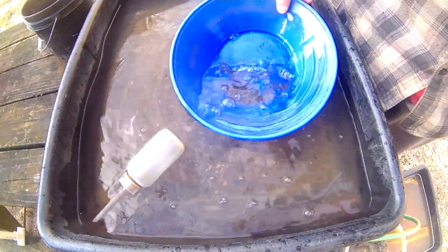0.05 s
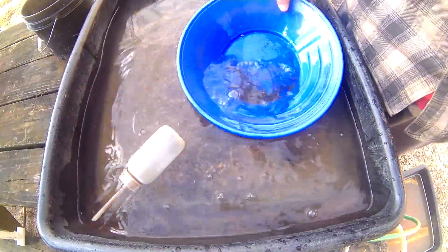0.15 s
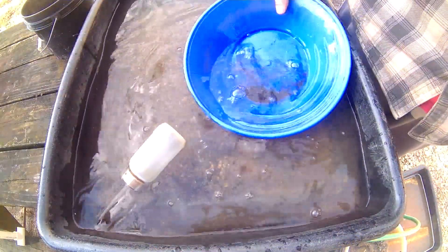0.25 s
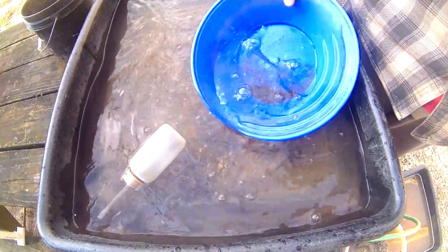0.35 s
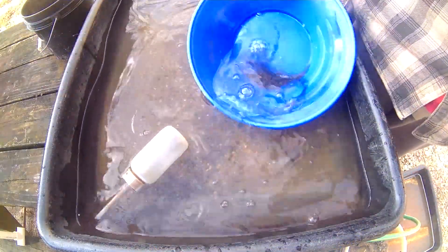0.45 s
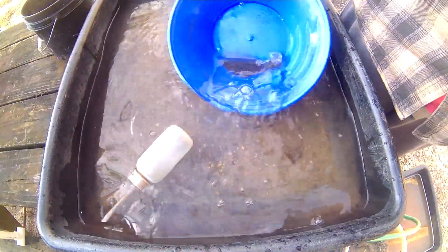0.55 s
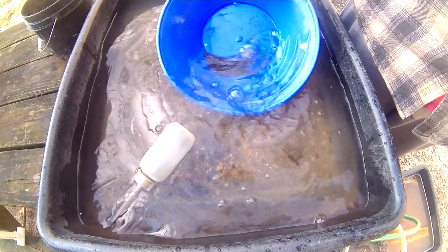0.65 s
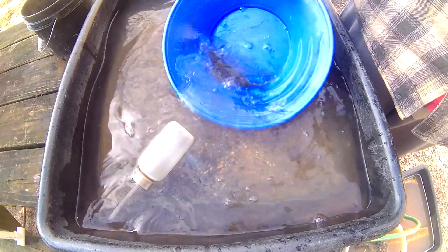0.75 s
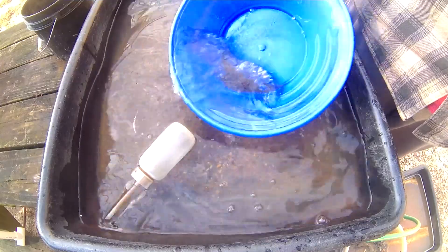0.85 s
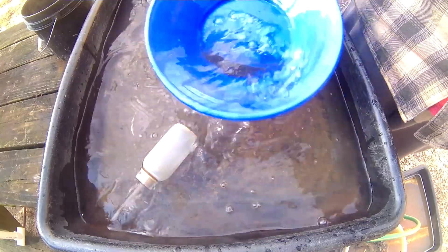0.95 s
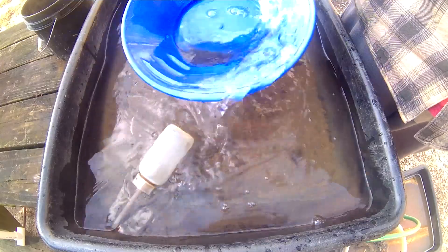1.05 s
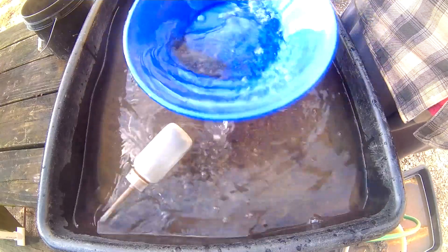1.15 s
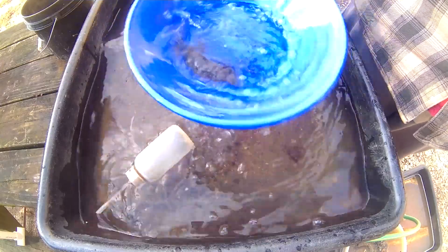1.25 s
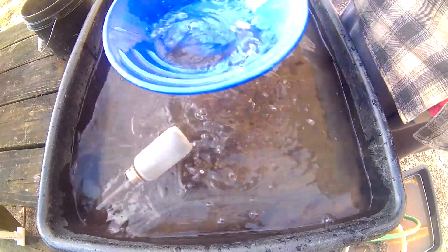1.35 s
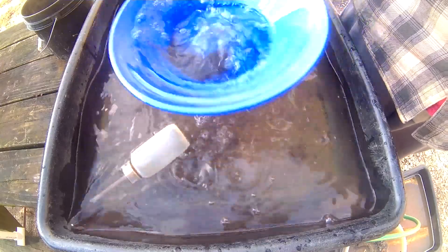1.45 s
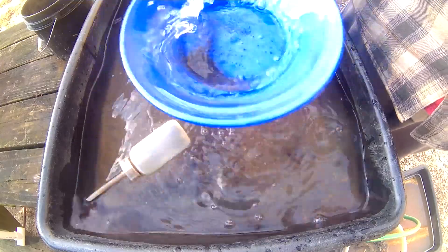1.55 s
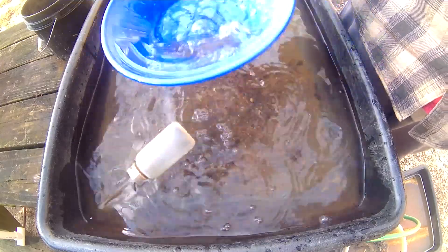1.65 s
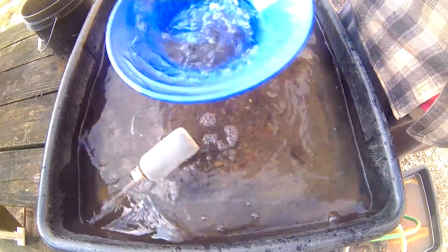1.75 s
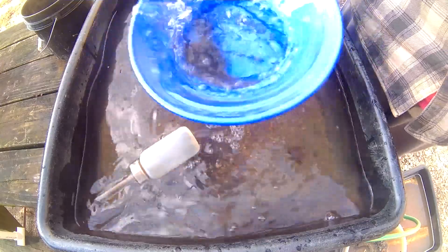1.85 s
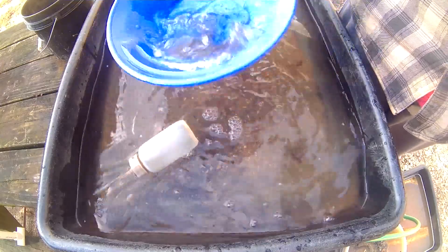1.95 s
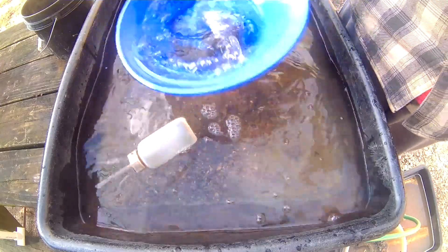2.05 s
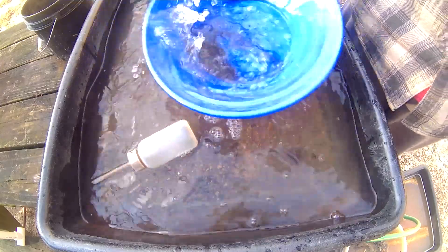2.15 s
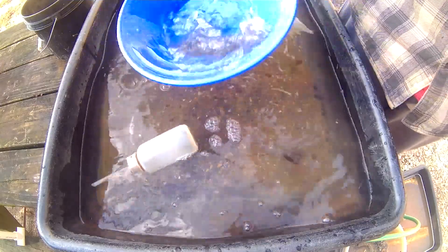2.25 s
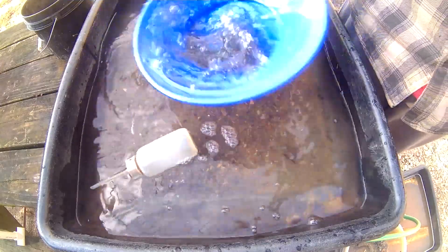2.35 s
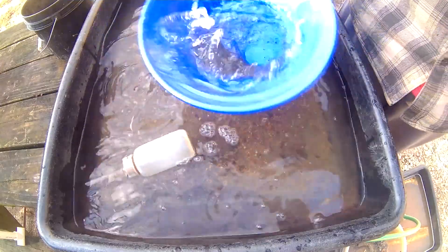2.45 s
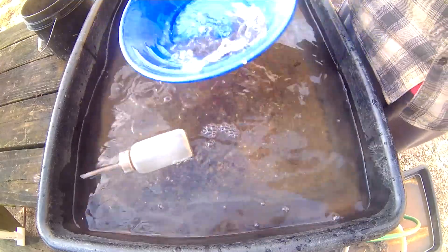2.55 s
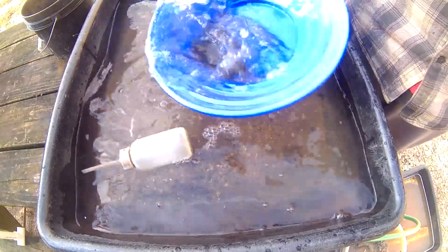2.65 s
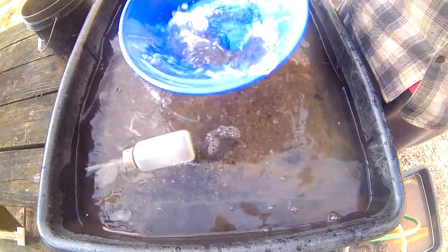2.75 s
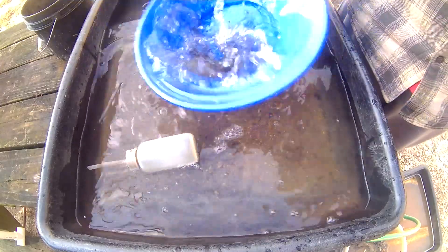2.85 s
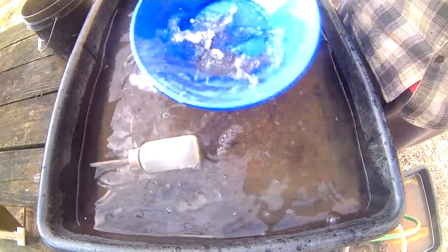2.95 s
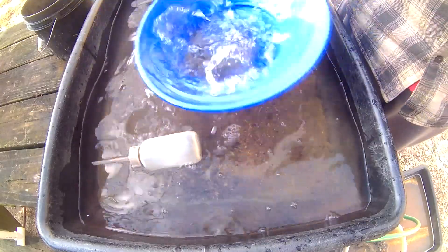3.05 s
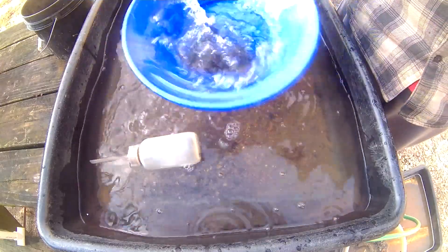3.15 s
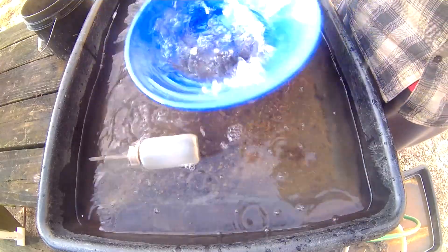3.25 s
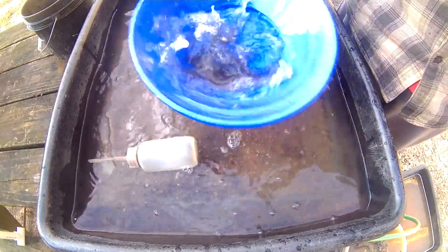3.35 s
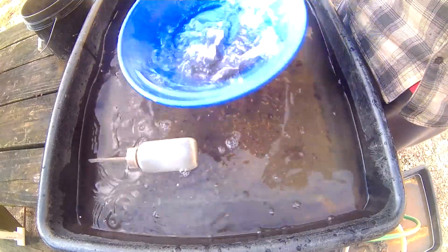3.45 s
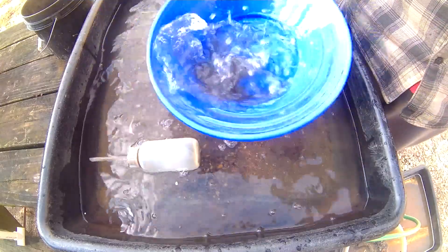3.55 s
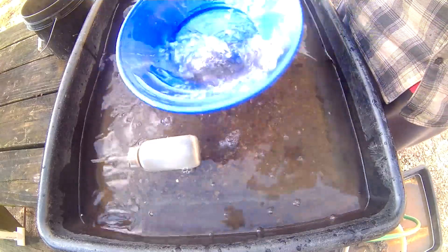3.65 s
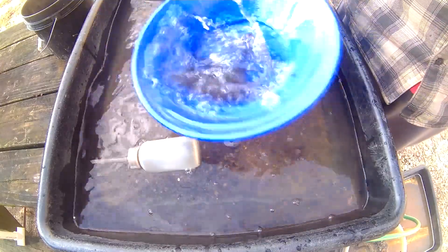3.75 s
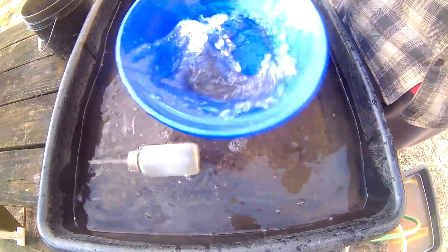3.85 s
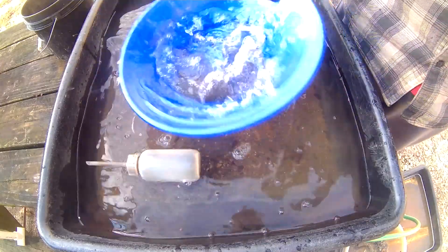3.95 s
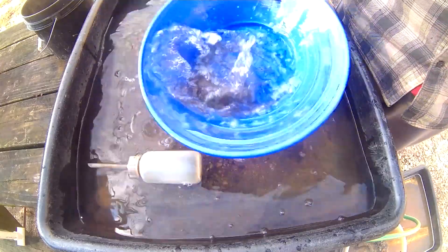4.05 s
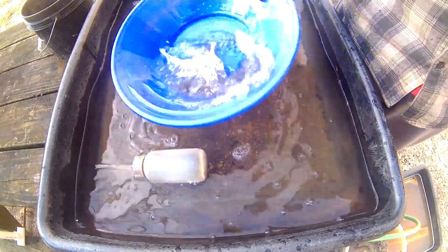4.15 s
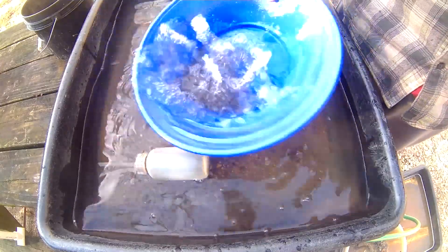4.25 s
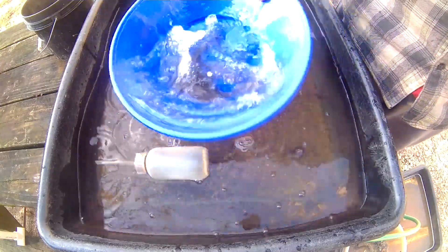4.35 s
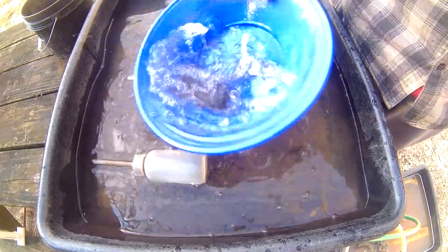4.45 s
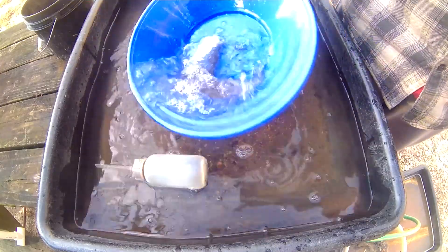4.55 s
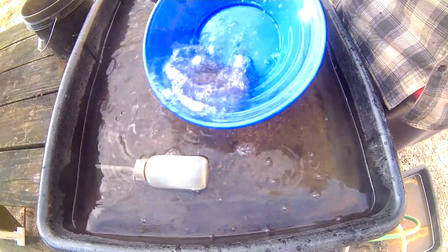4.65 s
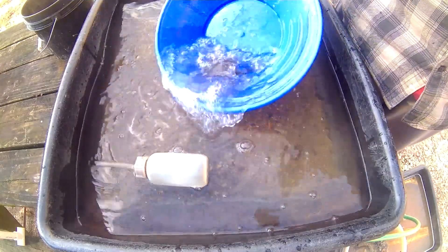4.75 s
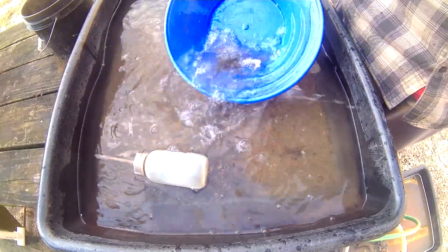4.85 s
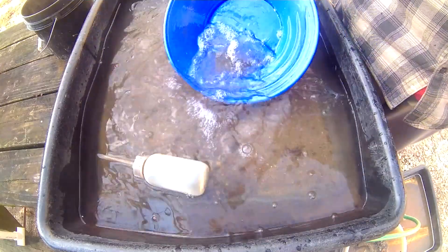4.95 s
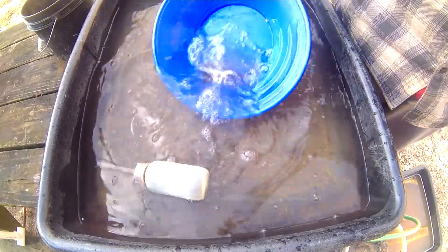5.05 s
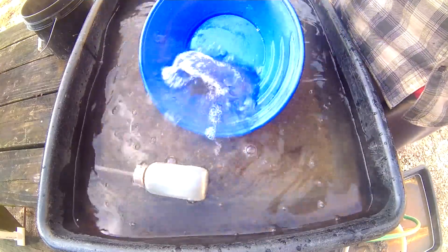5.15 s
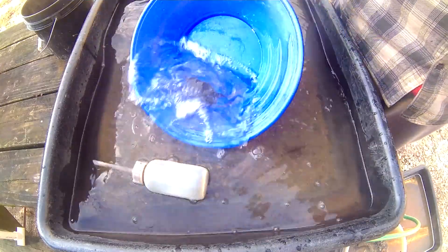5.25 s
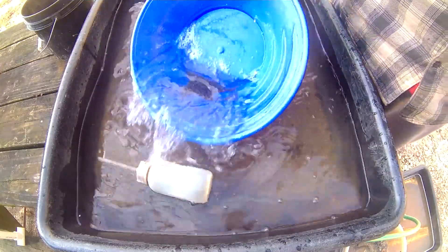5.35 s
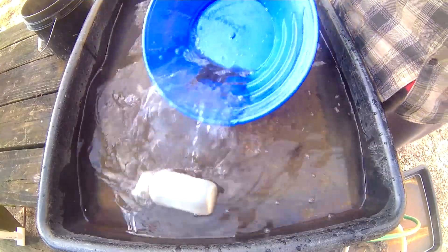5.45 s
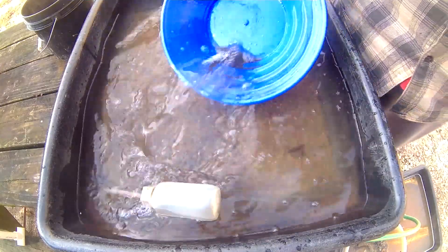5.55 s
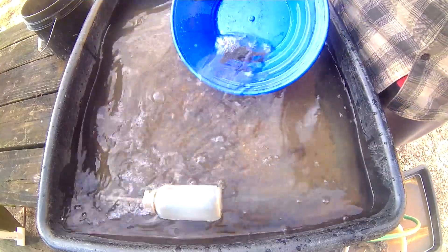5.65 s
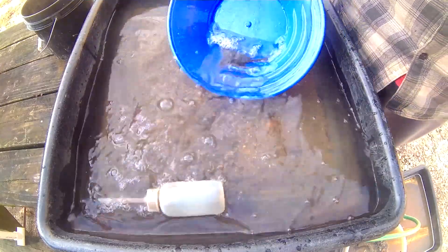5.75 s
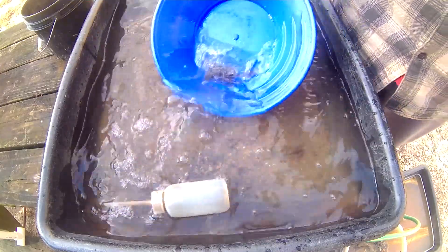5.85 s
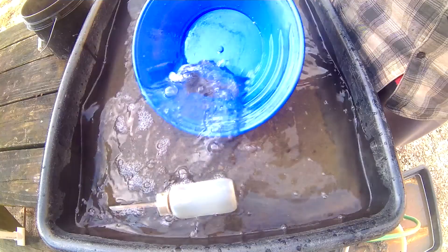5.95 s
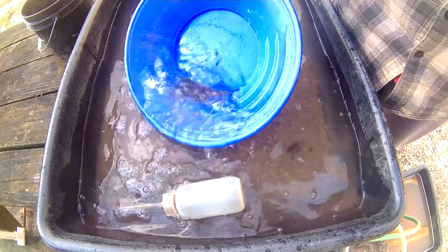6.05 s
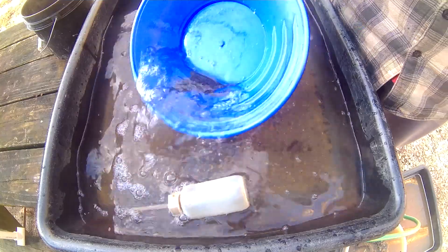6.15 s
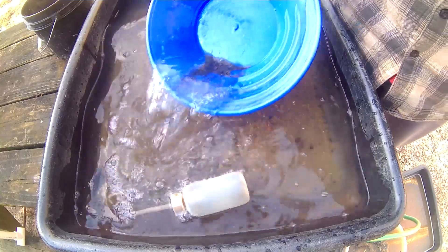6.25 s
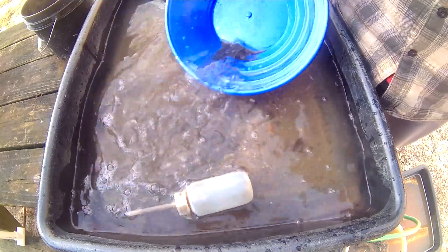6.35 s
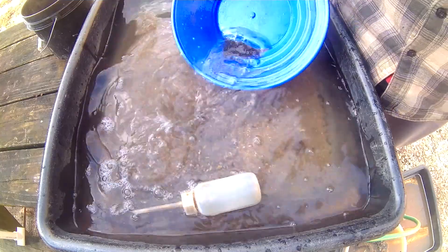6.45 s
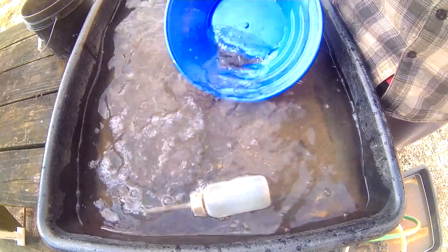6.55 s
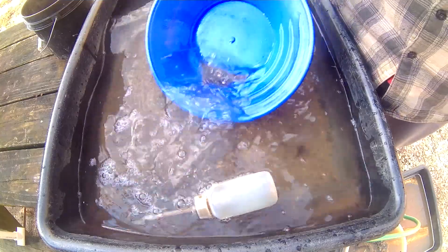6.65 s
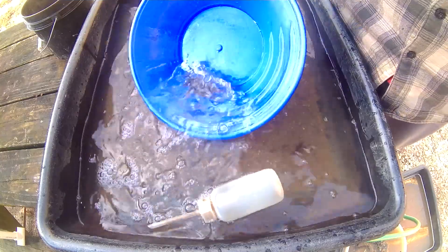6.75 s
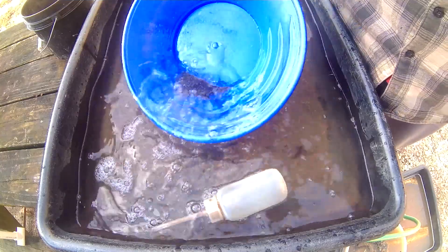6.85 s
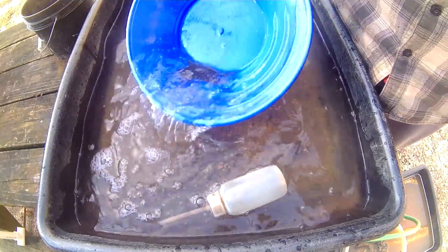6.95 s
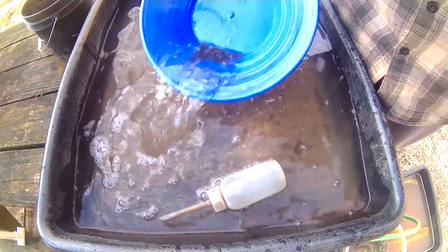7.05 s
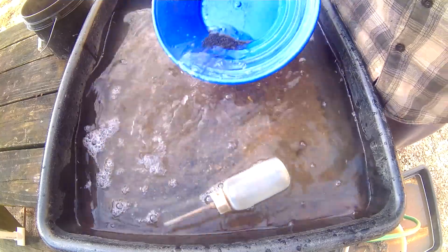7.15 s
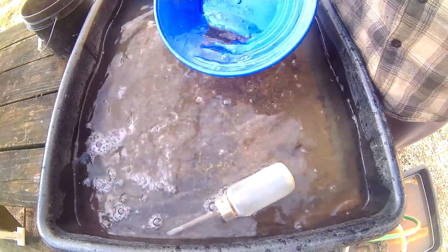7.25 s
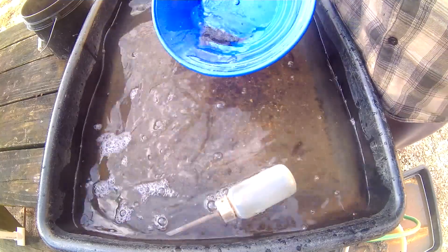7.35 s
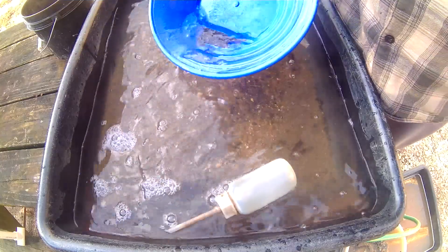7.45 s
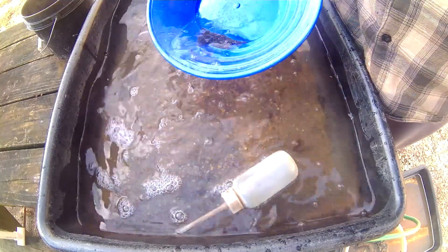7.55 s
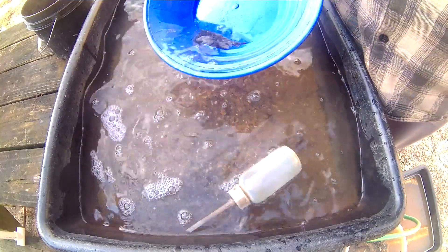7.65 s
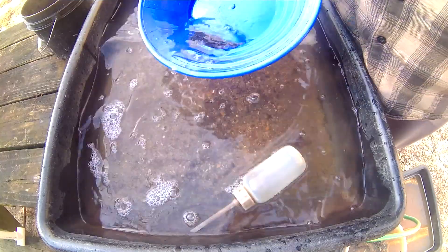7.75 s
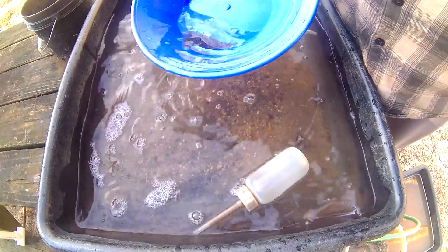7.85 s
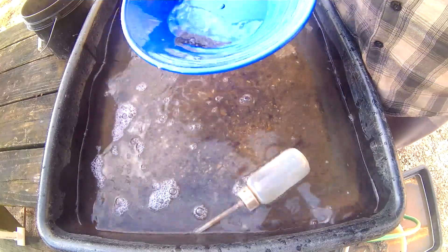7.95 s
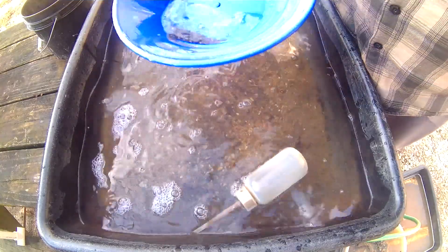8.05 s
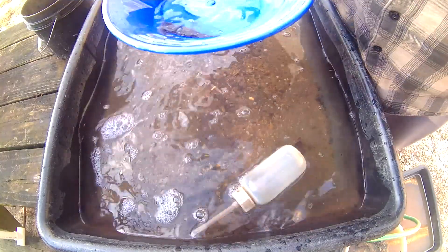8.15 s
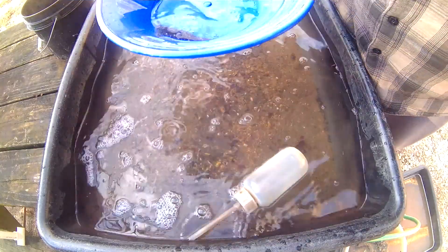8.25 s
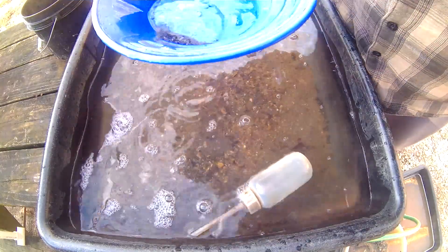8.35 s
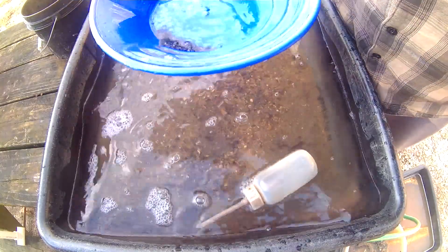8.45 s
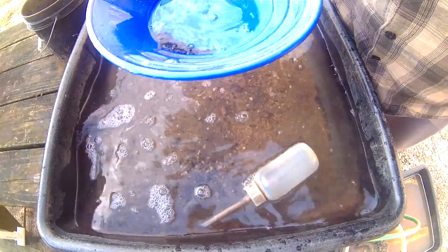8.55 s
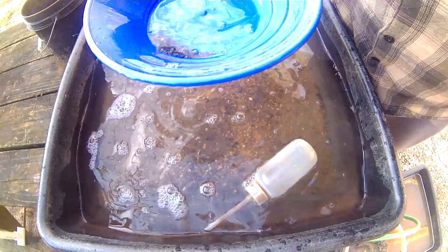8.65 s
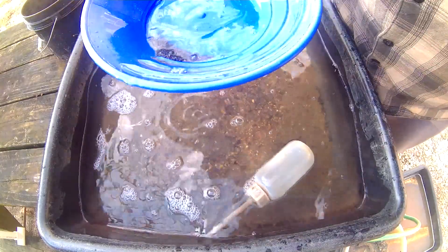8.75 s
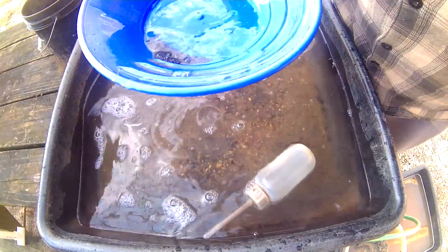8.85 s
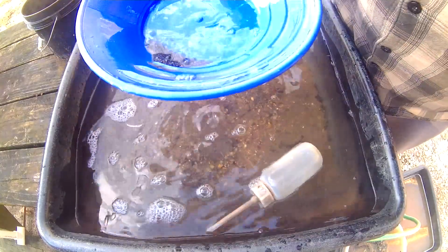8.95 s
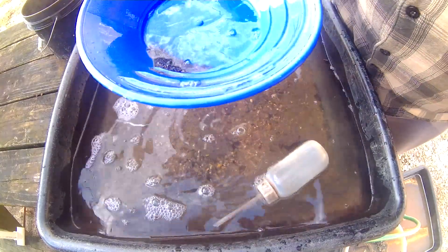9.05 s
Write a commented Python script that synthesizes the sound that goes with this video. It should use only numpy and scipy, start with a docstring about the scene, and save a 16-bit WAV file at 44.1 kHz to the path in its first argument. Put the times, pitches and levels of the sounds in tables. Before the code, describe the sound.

Outdoors, a small camera in a sealed hard case hears a plastic pan in a tub of water. Soft plops lead to quick, bubbly shakes and splashes until about five seconds, then sparser dips and near-silence. At the end, fingers scrape and squeeze the case in short strokes, with dull thuds and one loud knock. A faint hum and hiss remain beneath.

```python
"""At a tub of water, a plastic pan is swirled and dipped, heard by a small camera shut in a hard case.
Single bubbles are short fading tones heard directly; crowds of small bubbles and the wash pass through
the case's air cavity, splats through broad resonances. Near the end a hand takes hold: noise strokes
and knocks ring the case, and its mount sways. Behind lie a hum, hiss, puffs of air and a repeating
treble phrase of filtered noise."""
import sys
import numpy as np
from scipy import signal
from scipy.fft import rfft, irfft, next_fast_len
from scipy.io import wavfile
from scipy.ndimage import uniform_filter1d, map_coordinates

SR = 44100
rng = np.random.default_rng(int(sys.argv[2]) if len(sys.argv) > 2 else 0)


def dump_mix(stems):
    """Bounce the given channels to the path in sys.argv[1] as a 16-bit WAV at rate SR."""
    frames = np.atleast_2d(stems).T  # one column per channel
    limited = np.clip(frames, -1, 1)  # hard clip at full scale
    pcm = np.round(limited * 32767).astype(np.int16)
    wavfile.write(sys.argv[1], SR, pcm)


N = 402143  # length in samples

# Swirls and dips of the pan. Each row: middle in seconds, half length in seconds, slosh level in dB
# before its layers are mixed.
SWIRLS = [(0.107, 0.066, -68), (0.79, .079, -63.5), (1.039, 0.1, -54.5), (1.372, .048, -57.5),
          (1.536, 0.037, -58), (1.656, 0.035, -52.5), (1.991, 0.026, -48), (2.09, 0.033, -60),
          (2.284, 0.079, -57), (2.542, 0.084, -53.5), (2.78, 0.065, -52), (3.014, 0.057, -53.5),
          (3.237, 0.08, -53.5), (3.477, 0.041, -50), (3.698, 0.06, -50), (3.858, 0.026, -56.5),
          (3.97, 0.046, -50.5), (4.179, 0.053, -53), (4.358, 0.066, -54), (4.69, 0.012, -47.5),
          (5.287, 0.087, -59), (6.084, 0.076, -59), (6.262, 0.031, -58.5), (6.963, 0.047, -54)]
# Single bubbles and drips. Each row: start in seconds, peak level in dB, pitch near the loudest moment
# in Hz, level of the splat over the bubble in dB before its resonances.
SINGLE_BUBBLES = [(0.083, -43, 1435, -29), (0.43, -50.5, 2010, -30), (0.678, -45.5, 1840, -29),
                  (0.7662, -37, 1410, -27), (1.007, -47.5, 1990, -15.5), (1.525, -37.5, 1740, -19),
                  (1.703, -44, 3100, -14.5), (1.815, -47.5, 1340, -19), (1.936, -43.5, 1390, -24),
                  (1.9708, -39.5, 1490, -11), (2.007, -38, 1330, -23), (2.1528, -35.5, 1680, -19.5),
                  (2.2532, -44.5, 1270, -11.5), (2.2867, -42.5, 1860, -12.5), (2.341, -47.5, 1470, -11),
                  (2.492, -41.5, 1450, -20), (2.7185, -42, 1640, -25), (2.79, -29, 1410, -24),
                  (2.8819, -44, 1400, -17), (3.28, -39, 1340, -13), (3.4023, -43, 1450, -21),
                  (3.525, -40, 1510, -16.5), (3.6027, -44.5, 2680, -19), (3.643, -45, 1470, -16),
                  (3.6812, -44, 1660, -10), (3.882, -42.5, 1390, -17), (4.009, -40, 1420, -16),
                  (4.111, -40, 1520, -22), (4.1812, -36.5, 1310, -20.5), (4.298, -48, 1420, -24),
                  (4.418, -42.5, 1470, -15), (4.6712, -39, 1580, -38), (4.6851, -35.5, 1970, -13.5),
                  (5.0871, -47.5, 2630, -28), (5.2786, -41, 1310, -22), (5.342, -43, 1500, -28),
                  (5.458, -43.5, 1490, -41), (6.1944, -45.5, 1630, -23), (6.27, -43.5, 1250, -16),
                  (6.8925, -43.5, 1020, -24), (6.9688, -44.5, 1420, -20), (7.034, -42.5, 1560, -24)]
# How the air in the case passes outside sound. Each row: centre in Hz, width in Hz, gain in dB
# (for one pass).
CAVITY_MODES = [(1315, 174, 6.5), (2000, 370, 3), (3010, 440, 3.5), (5600, 4300, 1)]
# Finger strokes on the case. Each row: start in seconds, length in seconds, level in dB before the
# touch is mixed in, pressure from 0 to 1, extra level of the upper scrape in dB.
FINGER_STROKES = [(7.721, 0.056, -42, 0.2, 2), (7.803, 0.077, -47, 0.01, 2.5), (7.905, 0.11, -48, 0.08, 2),
                  (8.022, 0.089, -55.5, 0.94, -13), (8.113, 0.035, -38, 0.59, 0),
                  (8.169, 0.041, -42, 0.58, -1), (8.226, 0.016, -45.5, 0.47, 4),
                  (8.285, 0.0078, -46.5, 0.4, 1), (8.333, 0.095, -48, 0.3, -2),
                  (8.434, 0.041, -45.5, 0.74, -1), (8.541, 0.052, -45.5, 0.79, -1.5),
                  (8.656, 0.062, -40.5, 0.58, -2), (8.727, 0.066, -48.5, 0.96, 6),
                  (8.827, 0.045, -40, 0.67, -4), (8.875, 0.063, -52, 0.8, -3),
                  (8.929, 0.027, -41.5, 0.37, -6), (8.961, 0.074, -42.5, 0.95, 1),
                  (9.07, 0.042, -37, 0.89, -5)]
# Knocks on the case. Each row: time in seconds, strength of the ring in dB, tick over the ring in dB,
# thud over the ring in dB (all before the gains in knocks).
CASE_KNOCKS = [(7.728, -32.5, -28.5, -21), (8.03, -24, -48, -5.5), (8.11, -46, -30, 10.5),
               (8.184, -34, -44, -1), (8.467, -41, -33, -1), (8.7824, -32.5, -41, -28),
               (8.946, -45, -11, -3.5), (8.9737, -33, -20.5, -14), (9.0444, -31, -51, -9),
               (9.0638, -6, -32.5, -9.5)]
# Ways the case can ring. Each row: centre in Hz, width in Hz, gain in dB (for one pass).
CASE_MODES = [(82, 33, 2.5), (200, 96, 1.5), (287, 33, 4.5), (493, 46, 3.5), (749, 99, 7.5), (1034, 280, 3),
              (1375, 170, 6), (1804, 360, 6), (2650, 240, -1.5), (3190, 260, 0.5), (3600, 176, 2.5),
              (4110, 570, 2.5), (5320, 1060, -4.5), (6400, 610, -4.5), (8900, 490, -4), (11300, 3300, -9.5)]
# Thin squeaks of skin. Each row: start in seconds, length in seconds, level in dB.
SKIN_SQUEAKS = [(8.434, .045, -56), (8.558, 0.047, -59)]
# Mix of a light and a firm touch. Each holds: rasp, upper scrape, scrape, squeeze and creak,
# from high modes to low, in dB over the stroke.
LIGHT_MIX = [2.5, -5.5, -5.5, -22.5, -12]
FIRM_MIX = [-9.5, -7.5, -1.5, 4.5, -3]
# Jolts that set the mount swaying. Each row: time in seconds, starting level in dB before smoothing.
MOUNT_JOLTS = [(7.726, -30.5), (8.04, -37), (8.2, -34), (8.25, -32), (8.311, -34), (8.47, -35.5),
               (8.6, -37), (8.9, -36.5)]
# Treble phrases, perhaps an insect. Each row: first crackling run in seconds, hiss burst in seconds,
# middle of the first thin pip in seconds.
TREBLE_PHRASES = [(.285, 2.0, 2.5), (3.018, 4.605, 4.867), (5.5, 7.075, 7.383)]
# Bands of the treble phrases. Each row: centre in Hz, width in Hz, gain in dB (for one pass).
TREBLE_BANDS = [(5100, 250, 3), (9900, 980, 5.5), (13000, 640, 5.5), (15400, 600, 8.5)]
# Colour of the steady background. Each row: frequency in Hz, relative level in dB per Hz.
AIR_COLOUR = [(15, -53), (25, -32), (90, -0.5), (300, -8.5), (1100, -14.5), (1420, -4), (1850, -14),
              (2300, -20), (3200, -21), (7000, -26), (16000, -25.5)]
# Hum. Each row: frequency in Hz, typical peak level in dB.
HUM_TONES = [(125.6, -57.5), (251.2, -66)]
# Puffs of air in the bass. Each row: time in seconds, level in dB, joined by straight lines.
AIR_PUFFS = [(0, -52.5), (.6, -64), (1.15, -56.5), (2, -69), (3, -58), (4.3, -68), (4.75, -58.5), (6, -63),
             (9.12, -65)]

SHAKING_S = (1.2, 4.9)  # the lifted pan is shaken; before and after it is dipped
SPRAY_SHAKEN_DB, SPRAY_DIPPED_DB = -5, -11  # spray over the slosh
BUBBLE_RISE, LOUDEST_AGE = 0.28, 0.22  # average pitch climb per lifetime; age of the peak in lifetimes
PRESS_S, FIRST_TOUCH = 0.035, 0.29  # time for a full press from nothing; share present at first touch
RELEASE_DB_PER_S = 752
GRIP_S = 8.52  # the hand closes
SQUEAK_HZ = 5980
BEND_S, BEND_DB = 0.0013, -1.5  # the case bends before a knock lets it go: rise time, gain
SHUDDER_S, SHUDDER_DB = 0.07, 19  # shudder after a thud: time to fall 60 dB, gain before the modes
WOBBLE_HZ, SWAY_FADE_DB_PER_S, SWAY_RISE_S = 30, 40, 0.0037
PIP_HZ, PIP_GAP_S = 15400, 0.298
TOP_HZ = 15850  # band limit of the camera


def amp(db):
    """Turn a level in dB into a plain gain."""
    return 10 ** (np.asarray(db) / 20)


def unit(x):
    """Scale x to an average strength (rms) of 1."""
    return x / np.sqrt(np.mean(x ** 2) + 1e-20)


def noise():
    """White noise as long as the scene."""
    return rng.standard_normal(N)


def wobble(rate):
    """A smooth random curve through `rate` random points a second."""
    points = rng.standard_normal(int(N * rate / SR) + 4)
    return map_coordinates(points, [np.arange(N) * rate / SR])


def filtered(x, response):
    """Multiply the spectrum of x by a response that depends on frequency."""
    m = next_fast_len(N + SR // 2)
    return irfft(rfft(x, m) * response(np.fft.rfftfreq(m, 1 / SR)), m)[:N]


def through(x, modes, order=1):
    """Let x ring in resonances of alternating sign; a higher order deepens the valleys."""
    def response(f):
        total = 0
        for k, (centre, width, db) in enumerate(modes):
            resonance = 1j * f * width / (centre * centre - f * f + 1j * f * width)
            total = total + (-1) ** k * amp(db) * resonance
        return total ** order
    return filtered(x, response)


def blips(s, gain, hz, cycles, rise, attack):
    """Fading sine tones, whose pitch mostly climbs as each bubble nears the surface."""
    t = np.arange(SR // 40)[None] / SR
    age = t * (hz / cycles)[:, None]  # in lifetimes
    climb = age + rise[:, None] * age ** 2 / 2
    life = np.exp(-np.pi * age) * (1 - np.exp(-age / attack))
    wave = np.sin(2 * np.pi * cycles[:, None] * climb) * life / life.max(axis=1, keepdims=True)
    playable = hz[:, None] * (1 + rise[:, None] * age) < SR / 2
    wave *= playable * gain[:, None]
    at = (s * SR).astype(int)[:, None] + np.arange(t.size)
    return np.bincount(at.ravel(), wave.ravel(), N + SR)[:N]


def swarm(count, centre_hz, octaves, cycles, spread_db, clump_db):
    """A random crowd of small bubbles at rms 1, whose level wavers so that they come in clumps."""
    when, size = rng.random((2, count))
    pitch, rise = rng.standard_normal((2, count))
    hz = np.clip(centre_hz * 2 ** (octaves * pitch), 300, 15000)
    gain = amp(-spread_db * np.log(size + 0.02))
    crowd = blips(when * N / SR, gain, hz, cycles + 0 * hz, 0.078 + 0.13 * rise, attack=0.057)
    return unit(through(crowd, CAVITY_MODES) * amp(clump_db * wobble(35)))


def slosh():
    """Each swirl swells and dies: gurgling bubbles on a wash of noise, with finer spray above them."""
    t = np.arange(N) / SR
    low = sum(amp(db) * np.exp(-((t - s) / half) ** 2 / 2) for s, half, db in SWIRLS)
    shaken = (t > SHAKING_S[0]) & (t < SHAKING_S[1])
    high = low * amp(np.where(shaken, SPRAY_SHAKEN_DB, SPRAY_DIPPED_DB))
    wash = unit(through(noise(), CAVITY_MODES[:2]))
    mist = unit(through(noise(), CAVITY_MODES[2:], order=2) * amp(3 * wobble(60)))
    gurgle = swarm(count=4000, centre_hz=1622, octaves=0.24, cycles=13.6, spread_db=5.0, clump_db=np.pi)
    fizz = swarm(count=5000, centre_hz=4176, octaves=0.541, cycles=18, spread_db=5.5, clump_db=1.0)
    return low * (0.31 * wash + 0.84 * gurgle) + high * (0.49 * mist + 0.92 * fizz)


def bubbles():
    """Each large bubble sings briefly, along with the noisy splat of the drop that trapped it."""
    s, db, hz, splat_db = np.transpose(SINGLE_BUBBLES)
    rise = BUBBLE_RISE + 0.15 * rng.standard_normal(len(s))
    start_hz = hz / (1 + BUBBLE_RISE * LOUDEST_AGE)
    song = blips(s, amp(db), start_hz, 9 + hz / 400, rise, attack=0.34)
    splats = np.zeros(N + SR)
    t = np.arange(SR // 50) / SR
    for start, level in zip(s, db + splat_db):
        splat = amp(level - 60 * t / 0.047) * rng.standard_normal(len(t))
        splats[round(start * SR):][:len(t)] += splat
    return song + through(splats[:N], [(3200, 4400, 17.3), (5050, 3400, 20.4), (8560, 4500, 7.4)])


def case_parts():
    """Split the case's modes by pitch: rasp, upper scrape, scrape, squeeze and creak."""
    limits = [(3800, SR), (2300, 3800), (1200, 2300), (450, 1200), (0, 450)]
    return [[mode for mode in CASE_MODES if lo < mode[0] < hi] for lo, hi in limits]


def rubbing():
    """Skin sticks and slips over the case, so uneven noise rings its modes in strokes."""
    t = np.arange(N) / SR
    parts = case_parts()
    levels = np.zeros((len(parts), N))
    for s, length, db, pressure, upper_db in FINGER_STROKES:
        press = np.clip((t - s) / PRESS_S + FIRST_TOUCH, 0, 1) * (t >= s)
        release = amp(-RELEASE_DB_PER_S * np.clip(t - s - length, 0, None))
        mix_db = np.add(LIGHT_MIX, pressure * np.subtract(FIRM_MIX, LIGHT_MIX))  # harder is duller
        mix_db[1] += upper_db
        levels += amp(db + mix_db)[:, None] * press * release
    slips = amp(2.57 * wobble(76)) * noise()
    rub = np.zeros(N)
    for level, modes in zip(levels, parts):
        # as the fingers move they feed now one mode, now another
        voices = [amp(2.5 * wobble(18)) * through(slips, [mode], order=2) for mode in modes]
        if modes is parts[0]:
            for k in (0, -2, -1):
                voices[k] = voices[k] * amp(-10 * (t > GRIP_S))  # the closed hand damps these rasp modes
        rub += level * unit(sum(voices))
    squeaks = sum(amp(db) * np.exp(-((t - s - length / 2) / length * 2) ** 4)
                  for s, length, db in SKIN_SQUEAKS)
    return rub + squeaks * unit(through(slips, [(SQUEAK_HZ, 150, 0)], order=2))


def knocks():
    """Single blows, ticks and thuds ring the same modes; softer contact rounds off blows and thuds."""
    rasp, upper_scrape, scrape, squeeze, creak = case_parts()
    blows, ticks, thuds = np.zeros((3, N))
    for s, db, tick_db, thud_db in CASE_KNOCKS:
        at = round(s * SR)
        blows[at], ticks[at], thuds[at] = amp(db), amp(db + tick_db), amp(db + thud_db)
    soft = filtered(blows, lambda f: 1 / (1 + 1j * f / 1000) ** 2)  # a fingertip's contact is not sharp
    palm = filtered(thuds, lambda f: 1 / (1 + 1j * f / 700) ** 2)  # the hand's weight is softer still
    # the minus sign makes the bend build up ahead of the blow
    bend = amp(BEND_DB) * filtered(
        blows, lambda f: BEND_S * SR / (1 - 2j * np.pi * f * BEND_S) / (1 + 1j * f / 2500) ** 2)
    # after a thud the case shudders in its mount
    t = np.arange(SR // 10) / SR
    tail = amp(SHUDDER_DB - 60 * t / SHUDDER_S) * rng.standard_normal(len(t))
    shudder = through(signal.fftconvolve(thuds, tail)[:N], creak[1:])
    ring = amp(31) * through(soft, scrape, order=2) - amp(29) * through(soft, squeeze)
    click = amp(47) * through(ticks, upper_scrape + rasp, order=2) + amp(48) * through(ticks, rasp[2:])
    thud = amp(45.5) * through(palm, creak)
    return ring + click + bend + shudder - thud  # the thud is subtracted, like the squeeze modes


def sway():
    """The mount rocks at a low pitch after each jolt and fades until the next."""
    t = np.arange(N) / SR
    s, db = np.transpose(MOUNT_JOLTS)
    half = int(SWAY_RISE_S * SR / 2)
    rattle = unit(through(noise(), CASE_MODES[:1], order=2))
    last = np.searchsorted(s, t) - 1  # the latest jolt so far, -1 before the first
    level = amp(db[last] - SWAY_FADE_DB_PER_S * np.abs(t - s[last])) * (last >= 0)
    level = uniform_filter1d(level, size=2 * half + 1, origin=half)  # softens each start
    return level * (np.sin(2 * np.pi * WOBBLE_HZ * t) + 0.16 * rattle)


def gate(starts, length):
    """Open at each start for `length` seconds, with short ramps at both ends."""
    t = np.arange(N) / SR
    return sum(np.clip(np.minimum((t - s) / 0.0032, (s + length - t) / 0.022), 0, 1) for s in starts)


def treble():
    """Filtered noise makes five faint crackling runs, a stronger hiss burst and two thin pips."""
    t = np.arange(N) / SR
    first, burst, pip = np.transpose(TREBLE_PHRASES)
    sparks = noise() * (0.1 + 3 * (rng.random(N) < 0.003))  # a few samples jump out as crackle
    run_starts = np.linspace(first, burst, 5, endpoint=False).ravel()
    runs = amp(-70) * gate(run_starts, 0.134) * unit(through(sparks, TREBLE_BANDS[1:]))
    hiss = amp(-56) * gate(burst, 0.075) * unit(through(noise(), TREBLE_BANDS, order=2))
    pip_level = amp(-63) * sum(np.exp(-((t - s) / 0.011) ** 2) for s in [*pip, *(pip + PIP_GAP_S)])
    pips = pip_level * unit(through(noise(), [(PIP_HZ, 150, 0)]))
    return runs + hiss + pips


def background():
    """Even hiss with far outdoor noise, a slightly unsteady hum and puffs of air in the bass."""
    t = np.arange(N) / SR
    hz, db = np.transpose(AIR_COLOUR)
    air = unit(filtered(noise(), lambda f: amp(np.interp(np.log(f + 1), np.log(hz + 1), db))))
    drift = np.cumsum(wobble(3.0)) / SR  # the hum's pitch wanders a little
    hum = sum(amp(level + 1.55 * wobble(4.3)) * np.sin(2 * np.pi * f * (t + 0.00301 * drift))
              for f, level in HUM_TONES)
    rumble = unit(amp(0.75 * wobble(1.96)) * through(noise(), [(36, 34, 0)], order=2))
    puff_s, puff_db = np.transpose(AIR_PUFFS)
    return amp(-58) * air + hum + amp(np.interp(t, puff_s, puff_db)) * rumble


def scene():
    """Add everything up at the single microphone."""
    return (slosh() + bubbles() + rubbing() + knocks() + sway() + treble() + background())[None]


def record(dry):
    """The camera keeps nothing above its band limit."""
    return filtered(dry[0], lambda hz: hz < TOP_HZ)[None]


dry = scene()
out = record(dry)
dump_mix(out)
```